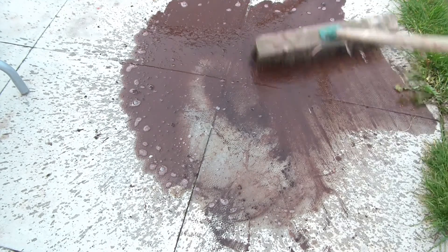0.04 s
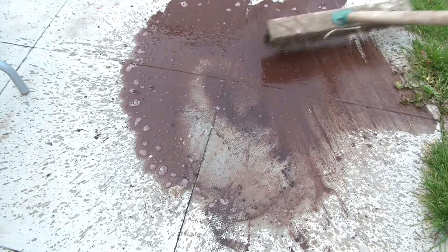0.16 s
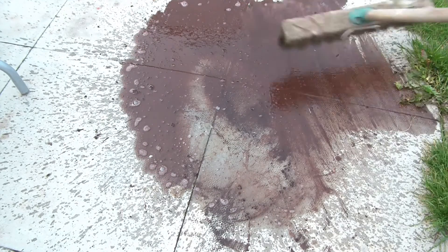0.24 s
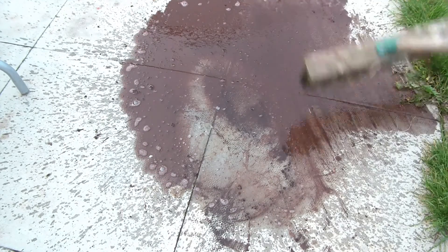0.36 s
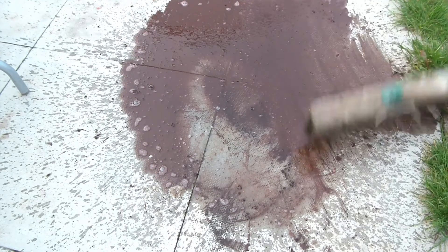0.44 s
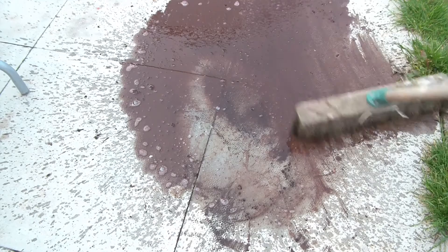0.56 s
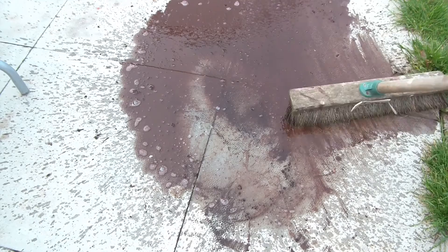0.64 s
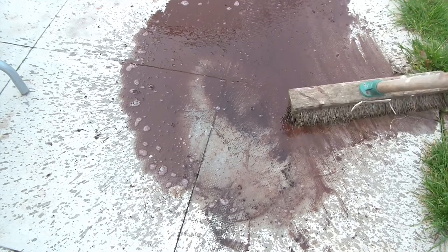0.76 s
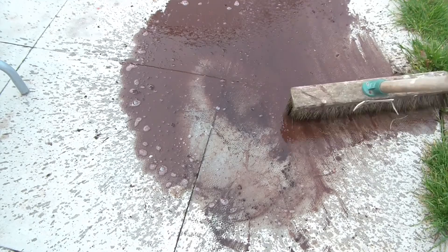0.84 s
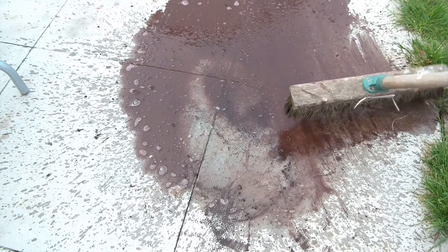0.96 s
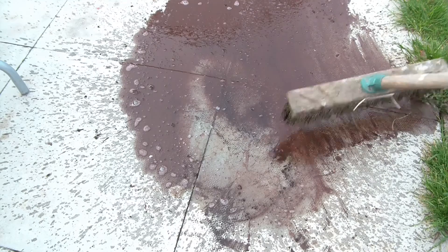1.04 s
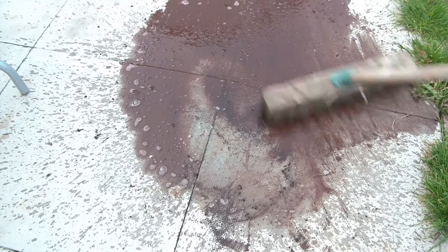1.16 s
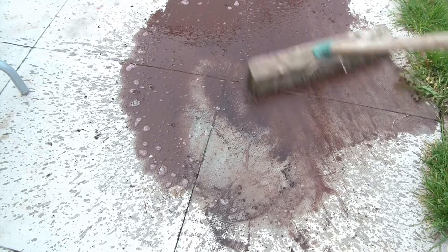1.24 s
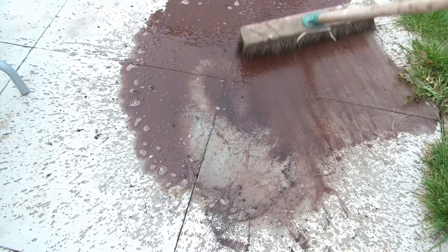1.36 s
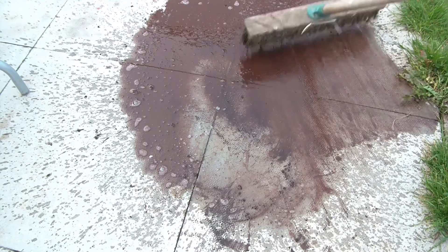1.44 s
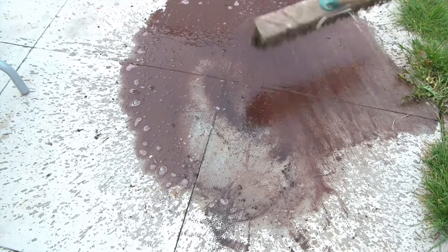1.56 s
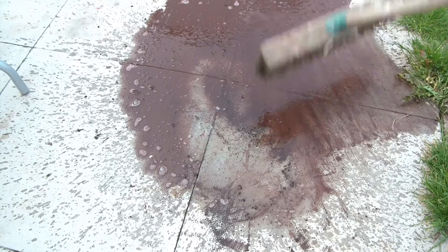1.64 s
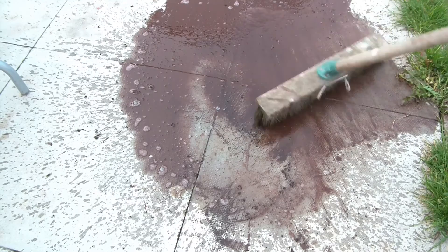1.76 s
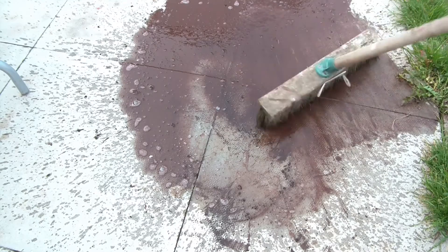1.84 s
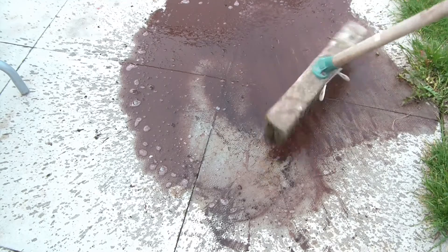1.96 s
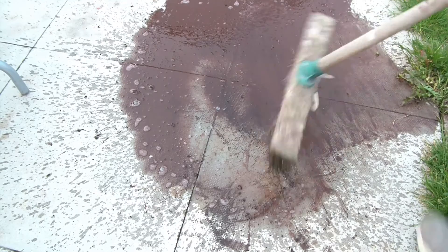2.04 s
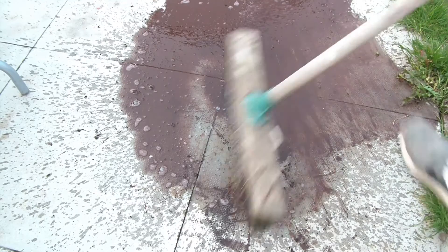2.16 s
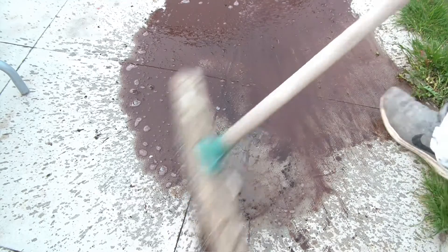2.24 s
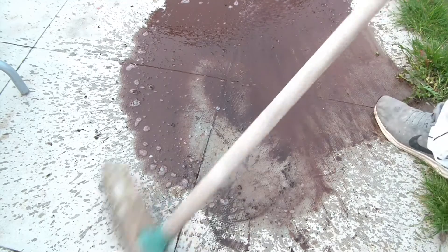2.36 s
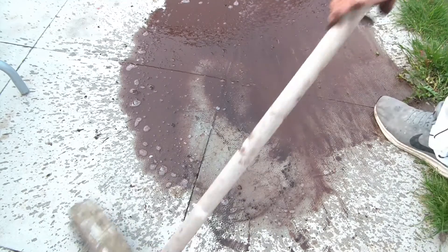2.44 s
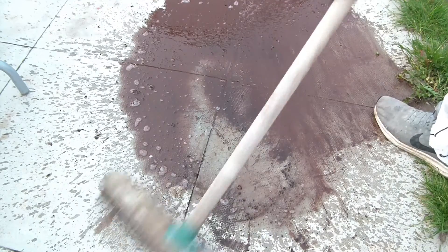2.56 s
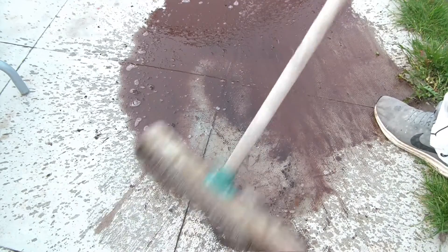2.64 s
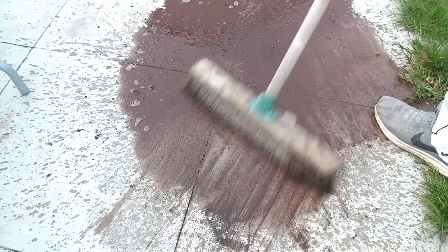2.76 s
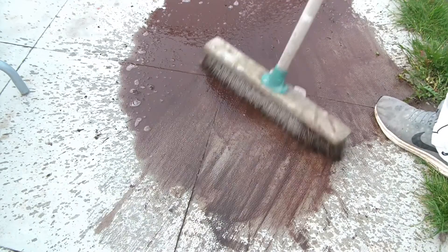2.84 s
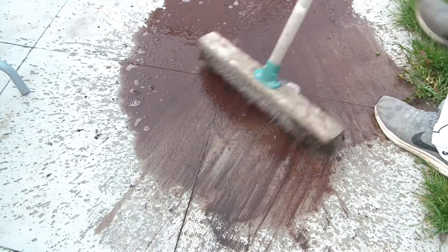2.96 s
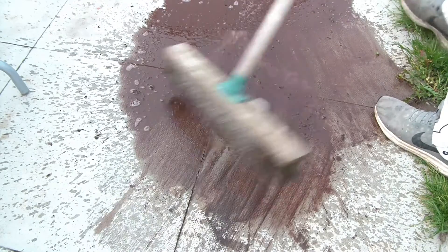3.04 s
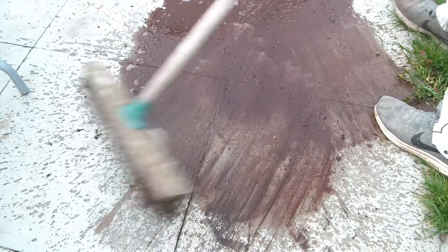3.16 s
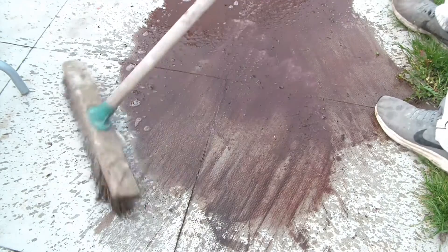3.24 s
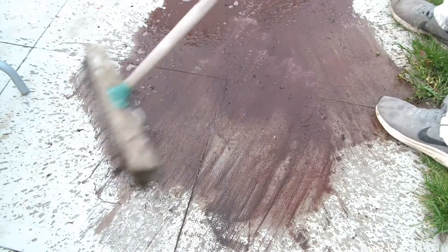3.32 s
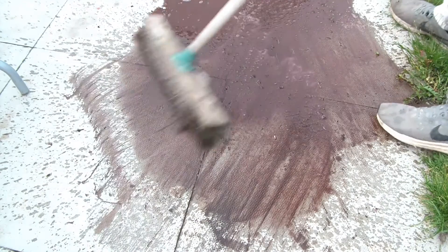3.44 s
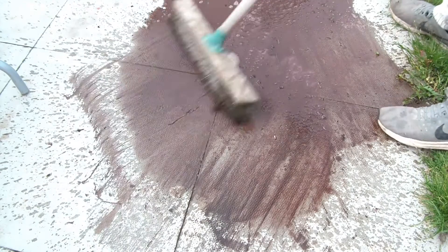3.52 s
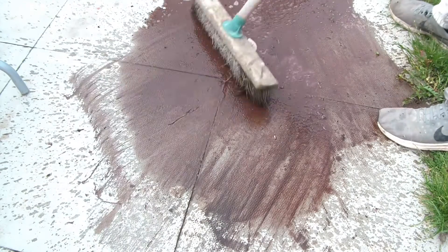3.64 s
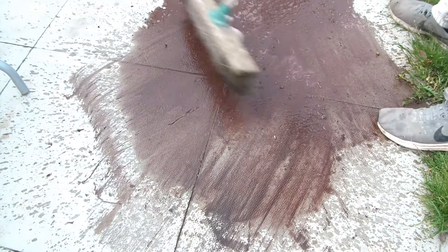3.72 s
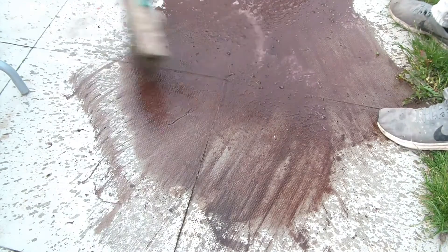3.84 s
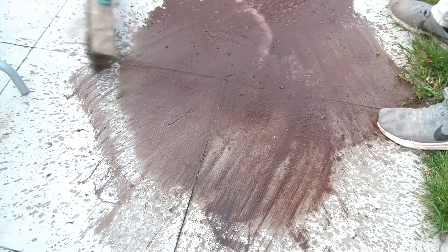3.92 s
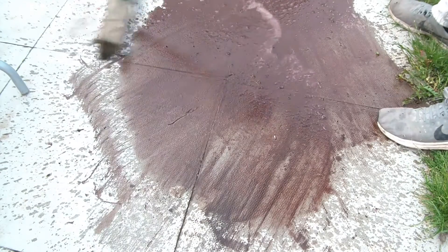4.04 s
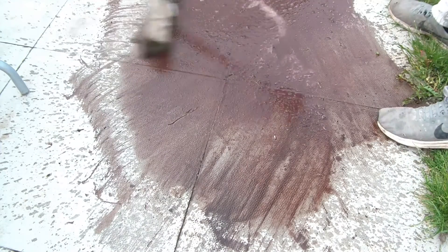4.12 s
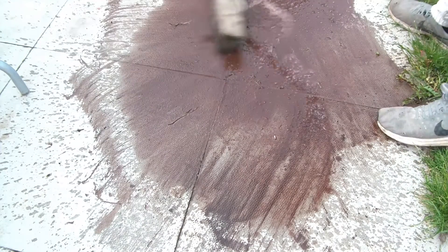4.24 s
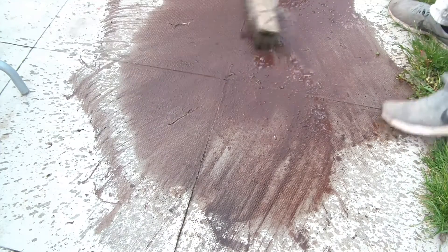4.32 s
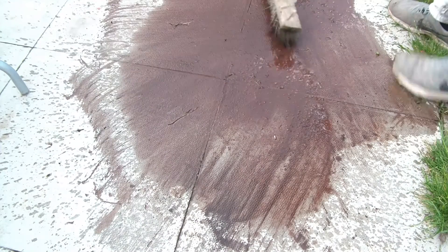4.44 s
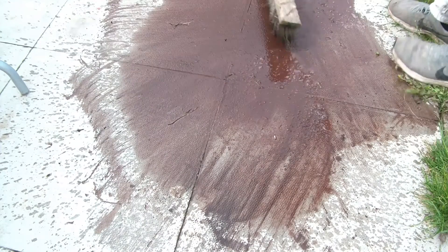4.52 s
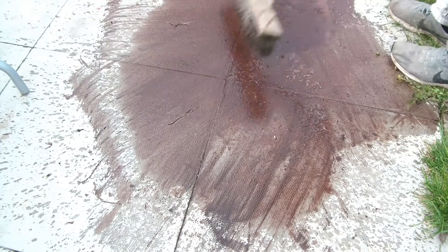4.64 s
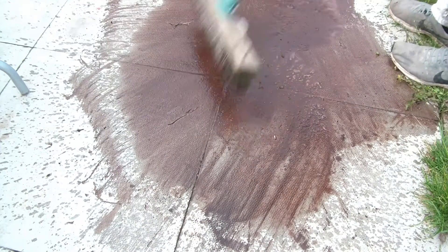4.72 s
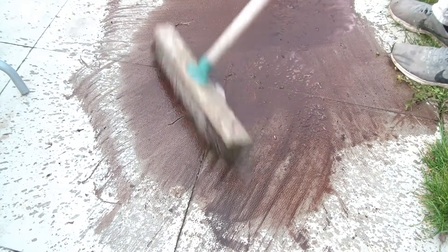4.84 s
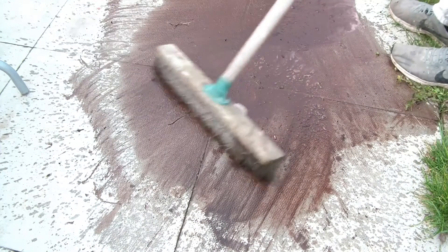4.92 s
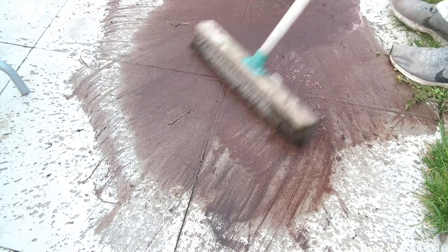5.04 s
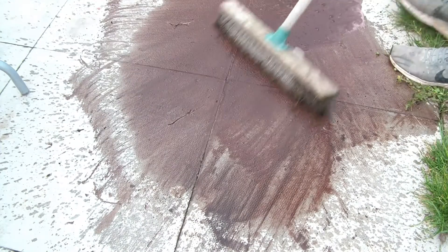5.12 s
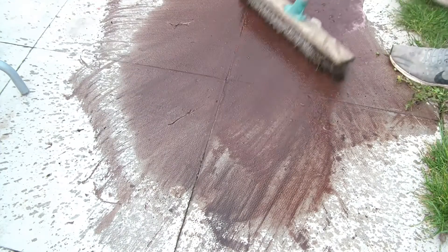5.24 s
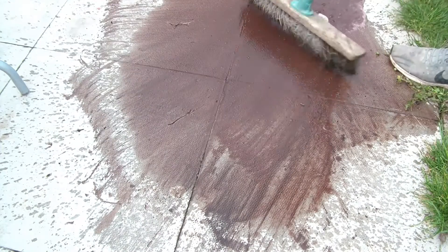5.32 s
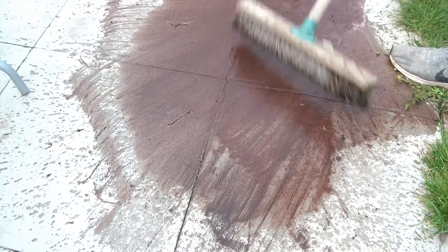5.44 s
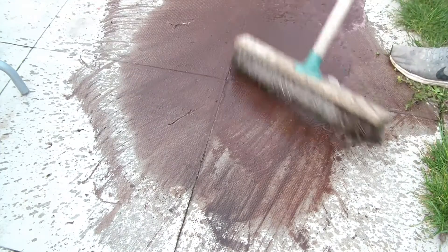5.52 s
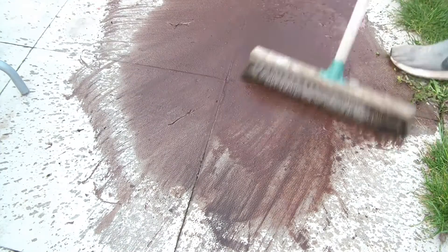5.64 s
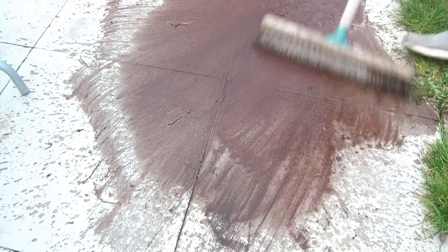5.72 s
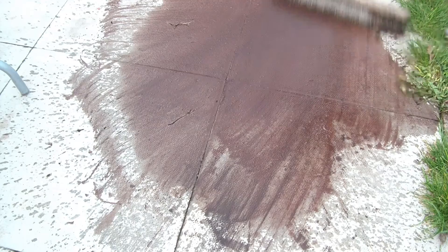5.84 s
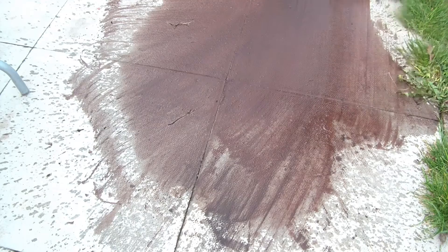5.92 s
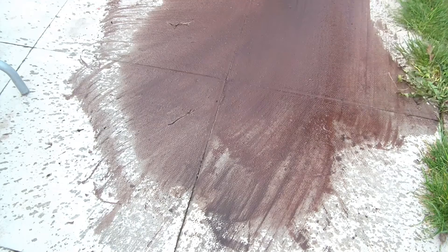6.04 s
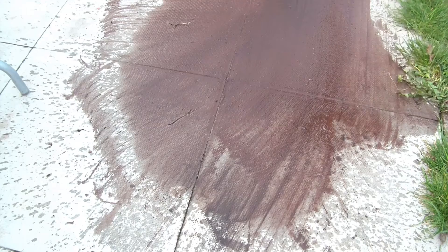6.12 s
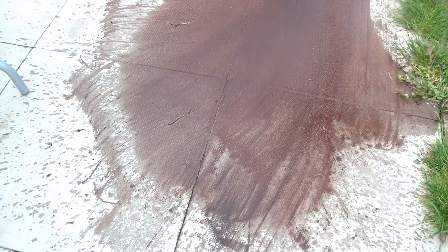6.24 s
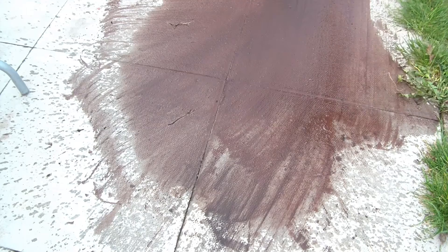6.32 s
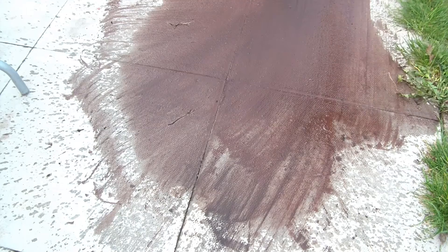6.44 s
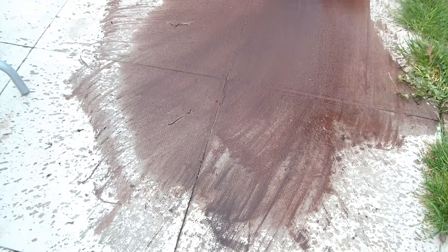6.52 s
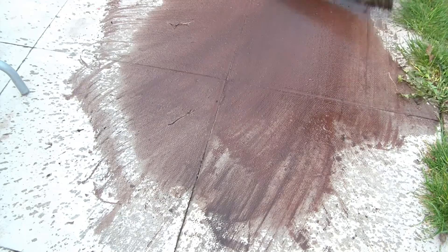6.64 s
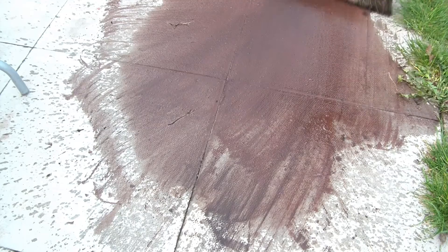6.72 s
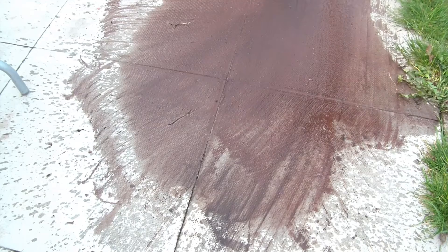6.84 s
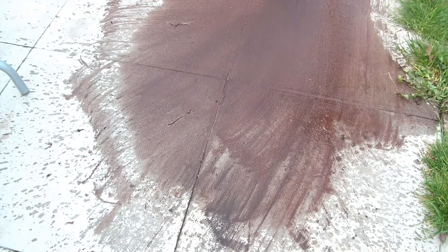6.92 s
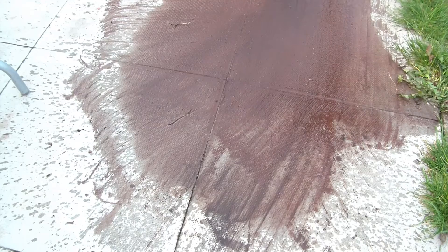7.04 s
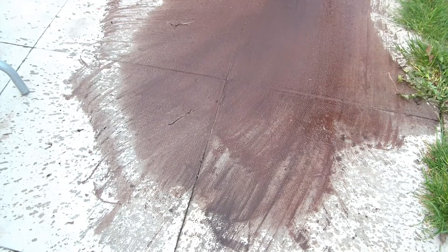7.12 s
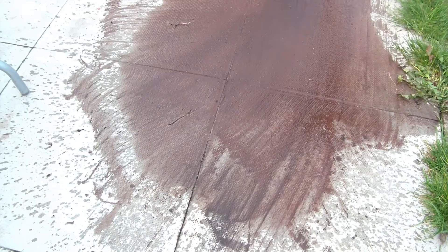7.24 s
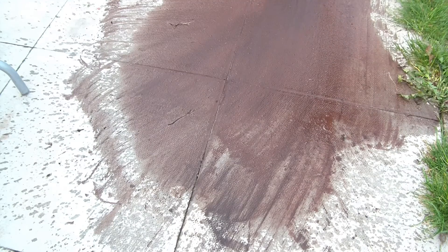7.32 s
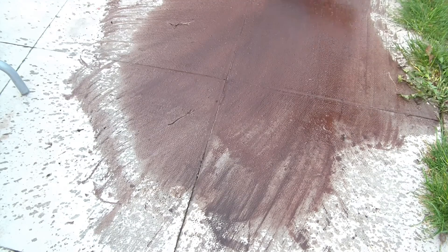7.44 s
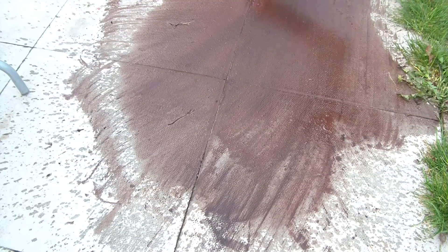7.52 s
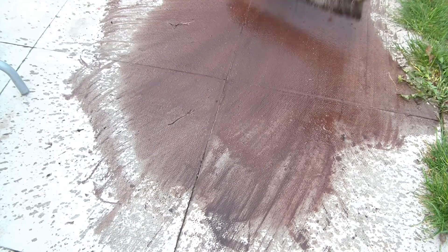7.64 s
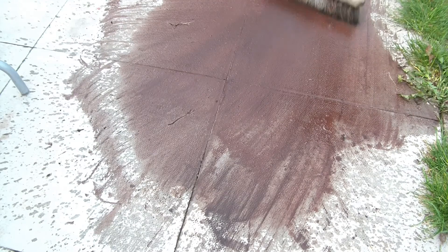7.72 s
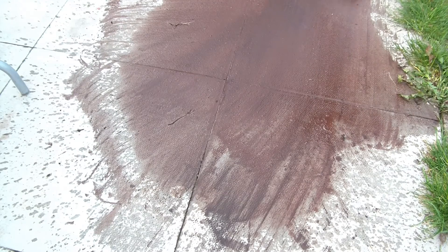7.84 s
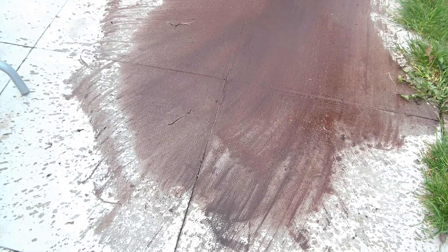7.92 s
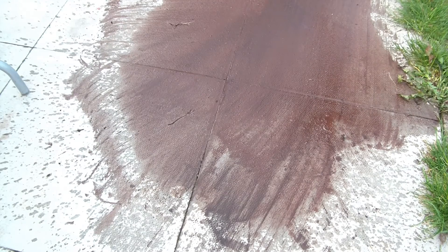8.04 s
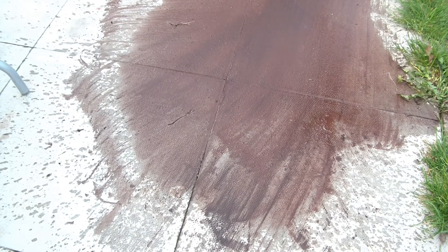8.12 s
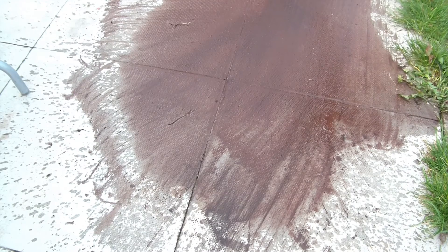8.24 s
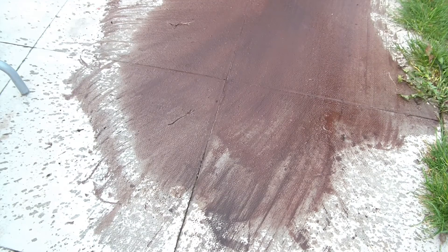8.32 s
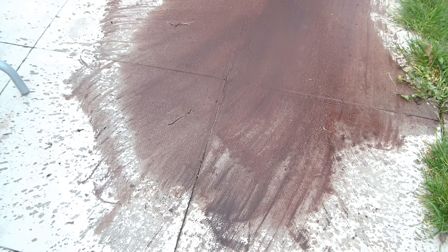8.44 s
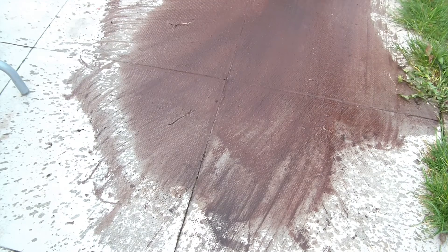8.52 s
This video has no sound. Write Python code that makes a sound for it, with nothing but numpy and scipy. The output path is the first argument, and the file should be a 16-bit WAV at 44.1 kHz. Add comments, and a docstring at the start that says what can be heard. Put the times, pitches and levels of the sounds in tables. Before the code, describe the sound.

A stiff broom scrubs wet concrete in hissing, rasping strokes, its wooden head knocking down between them over faint traffic.

```python
"""A stiff wooden yard broom scrubs wet concrete slabs outdoors, a metre or two away.
Thousands of bristle tips stick and slip; under weight the bent bristles rasp and drive the wooden head.
Set down, the head knocks in its bending modes and the whole broom bounces on its bristles.
The wet film fizzes, grit and drops tick between strokes, and distant traffic murmurs."""
import sys
import numpy as np
from scipy import signal
from scipy.fft import rfft, irfft, next_fast_len
from scipy.io import wavfile
from scipy.ndimage import map_coordinates

SR = 44100
rng = np.random.default_rng(int(sys.argv[2]) if len(sys.argv) > 2 else 0)


def dump(signal):
    """Clip the signal to [-1, 1] and save it as 16-bit WAV at the path in sys.argv[1]."""
    limited = np.clip(np.atleast_2d(signal).T, -1, 1)
    pcm = np.round(limited * 32767).astype(np.int16)
    wavfile.write(sys.argv[1], SR, pcm)


N = 377937
T = np.arange(N) / SR

# Pushes and drags: landing t/s, speeding up/s, slowing/s, level at top speed/dB, rise/dB, fall/dB,
# rasp/dB re tips, head/dB re tips, rasp gained by leaning/dB, extra left lead on landing/samples
STROKES = [(-0.025, 0.119, 0.09, -12.0, 5.0, 9.0, -0.5, -14.5, 0.5, 0.0),
           (0.583, 0.1, 0.07, -25.0, 32.0, 6, -4.5, -4.5, -10.5, 0.0),
           (0.86, 0.103, 0.115, -28.0, 45.0, 22.5, -4.5, -7.5, 16.0, 0.0),
           (1.225, 0.147, 0.118, -14.0, 8.0, 7.5, -5.5, -14.0, 4.0, 0.0),
           (1.831, 0.024, 0.14, -28.0, 10.0, 17.0, 1.5, -2.0, 9.5, 0.0),
           (1.98, 0.089, 0.064, -54.5, 7.5, 0.0, 6.0, 3.5, 1.5, 0.0),
           (2.171, 0.164, 0.085, -50.5, 7.5, 8.0, 3.0, 6.0, 9.0, 0.0),
           (2.471, 0.042, 0.061, -53.0, 0.5, 0.0, 9.5, 6.5, 13.0, 0.8),
           (2.599, 0.242, 0.174, -10.5, 21.5, 16.0, -5.0, -16.0, 1.0, 0.9),
           (3.357, 0.208, 0.172, -13.5, 19.5, 12.0, -3.5, -11.5, 3.0, 0.9),
           (4.102, 0.248, 0.266, -14.5, 15.0, 27.5, -3.5, -11.0, 17.5, 0.9),
           (4.972, 0.173, 0.183, -12.5, 28, 10.5, -9.5, -16, 14, 0.5),
           (5.17, 0.09, 0.07, -21, 7, 9, 4, -17, 0, 0),
           (5.64, 0.062, 0.038, -39.0, 7.5, 0.0, -3.5, -0.5, -1.0, 0.0),
           (5.728, 0.144, 0.169, -11.5, 4.5, 15.0, -6.0, -15.0, 15.5, 0.0),
           (5.913, 0.252, 0.141, -18.0, 3.0, 9.5, 0.0, -11.0, -1.0, 0.0),
           (6.768, 0.014, 0.007, -27.5, 2.5, 9.5, -2.5, -4.5, -4.0, 0.0),
           (6.824, 0.118, 0.295, -11.5, 7.0, 16.5, -4.5, -20.0, 3, 0.0),
           (7.05, 0.09, 0.06, -23.5, 5, 6, 1, -17, 0, 0), (7.828, 0.038, 0.01, -14.5, 4, 2, -13, -18, 0, 0),
           (7.812, 0.115, 0.366, -12.5, 7.0, 14.0, -7.5, -18.0, 2.0, 0.0)]
# Spectrum of the head loaded by its bristles: f/Hz, level/dB
LOADED_HEAD = [(100, -12.5), (450, -14), (750, -4), (1050, -5.5), (1300, -6.5), (1700, -4.5), (2250, -2),
               (2800, -3), (3500, -7.5), (6000, -21)]


def undb(db):
    """Amplitude ratio of a level in decibels."""
    return 10 ** (np.asarray(db) / 20)


def unit(x):
    """Normalisation to rms 1."""
    return x / np.sqrt(np.mean(x ** 2))


def colour(x, points):
    """Zero-phase filtering by points (f/Hz, gain/dB) joined on a log-frequency axis."""
    size = next_fast_len(len(x))
    hz, db = np.transpose(points)
    f = np.maximum(np.fft.rfftfreq(size, 1 / SR), 1)
    gain = undb(np.interp(np.log(f), np.log(hz), db))
    return irfft(rfft(x, size) * gain, size)[:len(x)]


def noise(length, spectrum):
    """Filtered Gaussian noise of rms 1."""
    return unit(colour(rng.standard_normal(length), spectrum))


def drift(rate):
    """Random modulation: rate Gaussian values a second, joined by straight lines."""
    knots = rng.standard_normal(N // 20)
    return np.interp(T * rate, np.arange(len(knots)), knots)


def add(track, start_s, sound):
    """Superposition of a sound on the track."""
    i = int(start_s * SR)
    sound, i = sound[max(-i, 0):], max(i, 0)
    track[i:i + len(sound)] += sound[:N - i]


def traffic(level_db=-37):
    """Incoherent sum: distant vehicles merge into a low wash that wavers a little."""
    spectrum = [(15, -38), (25, -10.5), (49, -1), (106, -7), (135, -7), (383, -11), (978, -4.5),
                (1670, -12.5), (2430, -22.5), (3180, -25.5), (7280, -33), (9020, -30), (9770, -33),
                (13100, -33), (15000, -36)]  # distant roads: f/Hz, level/dB
    return noise(N, spectrum) * undb(level_db + 0.39 * drift(3.11) + 0.5 * drift(13))


def engine():
    """Frequency and amplitude modulation: a far engine hums unevenly, fading in and out."""
    hum = [(0, 129.7, -55), (3.5, 127.7, -57), (3.9, 130.2, -45.5), (4.3, 132.5, -66.5),
           (5.9, 135.2, -53.5), (6.4, 138.7, -48), (7.15, 148.5, -47), (7.5, 147, -60), (8.5, 148, -61)]  # course of the hum: t/s, f/Hz, level/dB
    s, hz, db = np.transpose(hum)
    phase = 2 * np.pi * np.cumsum(np.interp(T, s, hz) + 2.63 * drift(15)) / SR
    return np.sqrt(2) * undb(np.interp(T, s, db) + 2.2 * drift(14)) * np.sin(phase)


def whines(wander_hz=3, flutter_db=4.5):
    """Modulated sinusoids: a far machine's wavering 894 Hz tone and a faint high microphone whine."""
    tones = [(894, -54, 0.77), (9000, -68, .3)]  # far machine, then microphone: f/Hz, level/dB, left-right phase/rad
    out = np.zeros((2, N))
    for hz, db, apart in tones:
        phase = 2 * np.pi * np.cumsum(hz + wander_hz * drift(25)) / SR
        out += undb(db + flutter_db * drift(6.6)) * np.sin(phase + np.array([[apart], [-apart]]) / 2)
    return np.sqrt(2) * out


def ticks(decay_s=0.0029, gain_db=-8):
    """Impact noise: flicked grit and drops hit the slab in short broadband bursts."""
    landings = [(0.3327, -21.5), (2.431, -28.5), (2.4763, -24.5), (2.5, -22), (3.2514, -32), (4.8045, -26),
                (4.8503, -21), (6.781, -21), (7.4699, -27), (8.504, -25)]  # grit and drops: t/s, relative level/dB
    spectrum = [(300, -14), (1200, 8), (2600, 6), (4300, 1.5), (6000, -8), (11000, -13), (16000, -24)]  # one impact: f/Hz, level/dB
    out, t = np.zeros(N), T[:SR // 30]
    for s, db in landings:
        add(out, s, undb(db + gain_db) * noise(len(t), spectrum) * np.exp(-t / decay_s))
    return out


def shot_noise(rate, spectrum, scatter_db):
    """Poisson process: rate filtered clicks a second, uneven in size, with mean power held at 1."""
    hit = rng.random(N) < rate / SR
    size = rng.standard_normal(N) * undb(scatter_db * rng.standard_normal(N))
    clicks = hit * size / np.sqrt(np.minimum(rate / SR, 1))
    return unit(colour(clicks, spectrum))


def fizz(tips, level_db=-31.5, decay_s=0.096, bubbles_per_s=900):
    """Exponential relaxation: foam whipped up by the bristle tips dies away as its bubbles burst."""
    spectrum = [(1000, -20), (3500, 4), (10000, -4), (15000, -11)]  # f/Hz, level/dB
    step = 1 / (decay_s * SR)
    foam = np.sqrt(signal.lfilter([step], [1, step - 1], tips ** 2))
    return undb(level_db) * foam * shot_noise(bubbles_per_s, spectrum, scatter_db=5)


def ring(modes, struck_hz, focus_octaves, t, alternate=True):
    """Modal superposition: damped sines, detuned at each blow; the point struck favours one pitch."""
    hz, db, t60 = np.transpose(modes)[:, :, None]
    share = undb(db) / (1 + (np.log2(hz / struck_hz) / focus_octaves) ** 2)
    hz = hz * (1 + 0.0075 * rng.standard_normal(hz.shape))
    swings = share * np.sin(2 * np.pi * hz * t) * np.exp(-np.log(1000) * t / t60)
    # in bending wood neighbouring modes swing in opposite senses
    return (-1 if alternate else 1) ** np.arange(len(modes)) @ swings


def thumps(focus_octaves=0.92, push_s=0.0005):
    """Mass on a spring: the broom's weight lands and rebounds on the bristles."""
    landings = [(0.5988, -3, 380), (1.2377, -9.5, 228), (1.8401, 2, 256), (1.859, -10, 110),
                (3.381, -25, 130), (4.123, -31, 220), (5.738, -26, 200), (7.829, -25, 170)]  # heavy landings: t/s, relative level/dB, favoured f/Hz
    modes = [(96, 1.5, 0.091), (143, -1.5, 0.065), (206, -4.5, 0.065), (288, -2, 0.036), (373, -2, 0.029),
             (494, 3, 0.011)]  # modes of the whole broom: f/Hz, level/dB, T60/s
    radiation = [(30, -21), (70, -6), (110, -2.5), (250, 0.5), (500, -0.5)]  # a small body radiates little deep bass: f/Hz, gain/dB
    out, t = np.zeros(N), T[:SR // 5]
    for s, db, hz in landings:
        bounce = ring(modes, hz, focus_octaves, t, alternate=False)
        add(out, s, undb(db) * bounce * (1 - np.exp(-t / push_s)))
    return colour(out, radiation)


def knocks(focus_octaves=0.34, crack_s=0.0043, shiver_db=-18, shiver_s=0.023, touch_db=-23):
    """Impulse excitation: bristles touch, the head rings and cracks on the slab, the bristles shiver."""
    blows = [ (0.5954, -7, 2720, -4), (.5996, -0.5, 980, -8), (1.231, -5.5, 3000, -12.5),
             (1.237, -11, 2300, -8.5), (1.239, -10, 980, -26), (1.8370, 1, 3070, -3.5),
             (1.8386, 5, 1280, 0.5), (1.8477, -21, 1610, -25), (2.5513, -25, 1100, -20),
             (2.5726, -11, 2000, -26), (2.5751, -2, 1190, -10), (2.581, -17, 1200, -30),
             (3.379, -4, 3170, -19), (3.383, -11.5, 1200, -13), (3.393, -11.5, 1490, -15),
             (4.092, -20.5, 2200, -22), (4.1213, -1.5, 2130, -37), (4.990, -22, 2820, -23.5),
             (5.027, -15.5, 1200, -16), (5.74, -13, 1090, -21), (6.829, -14, 1430, -25),
             (7.827, -15, 1110, -12.5), (7.836, -15, 1150, -23), ]  # the head lands or jolts: t/s, ring level/dB, favoured f/Hz, crack level/dB
    modes = [(699, -3, 0.048), (962, 2, 0.021), (1122, 0.5, 0.026), (1537, -3.5, 0.029), (1630, -12, 0.11),
             (1790, -3.5, 0.025), (2014, 1.5, 0.032), (2217, 7, 0.018), (2770, -7, 0.011),
             (2920, -2.5, 0.032), (3360, -1.5, 0.029), (3930, 2.5, 0.0087), (4380, 5.5, 0.014),
             (5140, -13, .02)]  # bending modes of the head: f/Hz, level/dB, T60/s
    crack_spectrum = [(200, -7), (1000, 6.5), (4500, 5.5), (6500, -9), (11000, -5.5), (16000, -18)]  # wood on concrete: f/Hz, level/dB
    out, t = np.zeros(N), T[:SR // 5]
    attack = 1 - np.exp(-t / 0.00054)
    decay = np.exp(-t / crack_s) + undb(shiver_db) * np.exp(-t / shiver_s)
    for s, db, hz, crack_db in blows:
        wood = ring(modes, hz, focus_octaves, t)
        crack = noise(len(t), crack_spectrum) * attack * decay
        add(out, s, undb(db) * wood / np.abs(wood).max() + undb(crack_db) * crack)
        # the heavier the landing, the sooner the bristles give way
        touch_s = 0.0094 / (1 + undb(crack_db + 20.5))
        touch = noise(len(t), LOADED_HEAD) * np.exp(-t / touch_s)
        add(out, s - t[-1], undb(touch_db + db / 3) * touch[::-1])  # swells up to the blow
    return out


def resonance(half_s, hz, glide, width_hz=330, skirt_db=-9):
    """Narrow-band noise: a rough resonance swells, glides and fades over twice half_s."""
    band = [(width_hz / 3, 0), (width_hz, skirt_db), (2 * width_hz, 2 * skirt_db + 1),
            (10 * width_hz, -70)]
    t = np.arange(-half_s, half_s, 1 / SR)
    phase = 2 * np.pi * np.cumsum(hz * 2 ** (glide * t)) / SR
    chatter = [colour(white, band)[:len(t)] for white in rng.standard_normal((2, SR))]
    swell = np.cos(np.pi / 2 * t / half_s) ** 4
    return unit(chatter[0] * np.cos(phase) + chatter[1] * np.sin(phase)) * swell


def bites(judder_delay_s=0.035, judder_half_s=0.1, judder_hz=996, judder_db=-7, gain_db=-0.44):
    """Forced vibration: the head judders at each landing and sings where bristles bite together."""
    # Bites under full weight: peak t/s, half-length/s, f/Hz, glide/(octaves/s), relative level/dB
    heavy_bites = [ (0.04, 0.16, 2370, 0.037, -23), (1.377, 0.27, 2200, -0.14, -32.5),
                   (2.3, 0.23, 850, -0.032, -36.5), (2.763, 0.26, 950, 0.32, -28),
                   (3.56, 0.25, 2250, 0.12, -31), (4.353, .4, 2158, -0.19, -24),
                   (4.418, 0.25, 1620, -0.052, -30), (4.588, 0.089, 800, -0.029, -34),
                   (6.071, 0.18, 1100, 0.017, -27), (6.137, 0.2, 1640, 0, -33),
                   (6.123, .23, 2040, -.6, -20), (7.017, 0.27, 1735, 0.66, -31.5), ]
    judders = [(lands + judder_delay_s, judder_half_s, judder_hz, 0, db + head_db + judder_db)
               for lands, _, _, db, _, _, _, head_db, _, _ in STROKES]
    out = np.zeros(N)
    for s, half_s, hz, glide, db in judders + heavy_bites:
        add(out, s - half_s, undb(db + gain_db) * resonance(half_s, hz, glide))
    return out


def head_reflection(x, delay_s=0.000611, wander=0.2, echo_db=-14):
    """Comb filtering: the head's underside reflects the scrubbing by a path that shifts as it tilts."""
    delay = delay_s * SR * np.exp(wander * drift(4))
    echo = map_coordinates(x, [np.arange(N) - delay], order=3, mode="nearest")
    return (x + undb(echo_db) * echo) / np.hypot(1, undb(echo_db))


def strokes(land_s=0.044, unload_s=0.097, unload_db=2.5, speed_power=1.37, head_follows=0.52):
    """Friction noise grows with speed and load: amplitudes of tips, rasp and head, and the left lead."""
    stance = [(0, -0.53), (2.2, -0.55), (5.8, -0.24)]  # the sweeper moves from the right towards the centre: t/s, left lead/samples
    lift_db_per_s, trail_db, trail_db_per_s = 338, -13, 126
    power, lead = np.zeros((3, N)), np.interp(T, *np.transpose(stance))
    for lands, rise_s, fall_s, db, rise_db, fall_db, rasp_db, head_db, lean_db, left in STROKES:
        length = rise_s + fall_s
        on = (T > lands) & (T < lands + length + 0.5)
        t = T[on] - lands
        before, after = np.clip(1 - t / rise_s, 0, 1), np.clip((t - rise_s) / fall_s, 0, 1)
        progress, bedded = np.minimum(t / length, 1), np.minimum(t / land_s, 1)
        speed_db = -rise_db * before ** speed_power - fall_db * after ** speed_power
        # the weight comes off just before the lift, so the rasp dies first
        weight_db = lean_db * (progress - 0.5) - unload_db * np.clip(1 + (t - length) / unload_s, 0, 1)
        # most bristles flick free at the lift; a few long ones trail on
        lifted_s = np.maximum(t - length, 0)
        release_db = np.maximum(-lift_db_per_s * lifted_s, trail_db - trail_db_per_s * lifted_s)
        contact = bedded * undb(db + release_db)
        layers_db = [speed_db, speed_db + rasp_db + weight_db, head_follows * speed_db + head_db]
        power[:, on] += (contact * undb(layers_db)) ** 2
        lead[on] += left * (1 - progress) * bedded
    return np.sqrt(power), lead


def scrub(tips, rasp, head):
    """Stick-slip friction: a slow broom crackles; a fast one frees so many bristles that they hiss."""
    tip_spectrum = [(300, -43.5), (2500, -20), (5000, -8), (6300, -6), (7600, -2), (10000, 0), (11800, -5),
                    (13800, -5), (15500, -10)]  # tips snapping free: f/Hz, level/dB
    rasp_spectrum = [(300, -43), (1500, -26), (2500, -10.5), (3200, -5.5), (4300, -0.5), (5300, -2),
                     (6100, -9), (8000, -9.5), (15000, -50)]  # bent bristles: f/Hz, level/dB
    slips_per_s = 2200 + 200000 * tips
    hiss = undb(1.28) * tips * shot_noise(slips_per_s, tip_spectrum, scatter_db=-1.5)
    bent = undb(3.0) * rasp * shot_noise(slips_per_s, rasp_spectrum, scatter_db=0.5)
    wood = undb(2.5) * head * shot_noise(slips_per_s, LOADED_HEAD, scatter_db=1.4)
    return hiss + bent + wood


def ports(mid, side, lead, split_hz=4600):
    """Mid-side stereo: the treble reaches two microphone ports with time and level differences."""
    imbalance = [(3500, -3), (4300, 1), (5600, 2.5), (7300, -1), (9600, 1.1), (12000, -3), (15000, -1.5)]  # left minus right: f/Hz, level/dB
    treble = signal.sosfiltfilt(signal.butter(6, split_hz, "high", fs=SR, output="sos"), mid)
    out = []
    for sign in (1, -1):
        shifted = map_coordinates(treble, [np.arange(N) + sign * lead / 2], order=3, mode="nearest")
        response = [(hz, sign * db / 2) for hz, db in imbalance]
        out.append(mid - treble + sign * side + colour(shifted, response))
    return np.array(out)


def scene():
    """Superposition of the outdoor background and the broom, in stereo."""
    traffic_width = [(100, -18.5), (500, -18), (900, -13.5), (1500, -16), (4000, -6), (15000, 0.5)]  # stereo width of the traffic: f/Hz, side level/dB
    # Stereo width of the scrubbing, mono in the mids and wide in the treble: f/Hz, side level/dB
    scrub_width = [(100, -16), (1200, -76), (3000, -88), (4100, -21.5), (5200, -9.5), (6500, -2),
                   (8000, -12.5), (10000, -7), (15000, -7.5)]
    gains, lead = strokes()
    # tufts catch and release together on the rough slab, most unevenly under a light touch
    lightness = 1 / (1 + gains[0] / undb(-31.5))
    gains = gains * undb((0.39 + 2.0 * lightness) * drift(45) + 0.5 * drift(70) + 0.24 * drift(350))
    blows = knocks() + thumps()
    broom = head_reflection(scrub(*gains)) + bites() + blows + ticks() + fizz(gains[0])
    ground_echo = undb(-21.5) * np.roll(blows, SR // 300)
    side = colour(scrub(*gains), scrub_width) + colour(traffic(), traffic_width) + ground_echo
    return ports(broom + traffic() + engine(), side, lead) + whines()


def duck(x, below_hz=1400, threshold_db=-19, attack_s=0.29, release_s=0.0089):
    """Automatic gain control: sustained loud sound slowly turns the lows down; they return quickly."""
    power = np.mean(x ** 2, axis=0)
    slow, quick = (signal.lfilter([1 / (s * SR)], [1, 1 / (s * SR) - 1], power)
                   for s in (attack_s, release_s))
    excess = np.minimum(slow, 2 * quick) / undb(threshold_db) ** 2
    gain = 1 / np.sqrt(1 + excess ** 1.19)
    lows = signal.sosfiltfilt(signal.butter(2, below_hz, fs=SR, output="sos"), x)
    return x - lows * (1 - gain)


def record(dry, top_hz=15350):
    """Soft saturation rounds the loudest peaks, gain control ducks the lows, a low-pass cuts the top."""
    rounded = dry / (1 + dry ** 8) ** (1 / 8)
    low_pass = signal.ellip(12, 0.1, 80, top_hz, fs=SR, output="sos")
    return signal.sosfilt(low_pass, duck(rounded))


dry = scene()
out = record(dry)
dump(out)
```